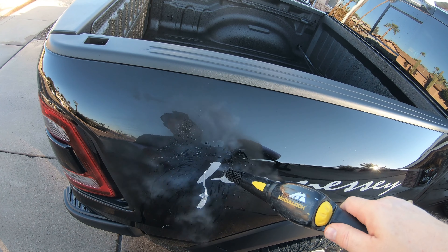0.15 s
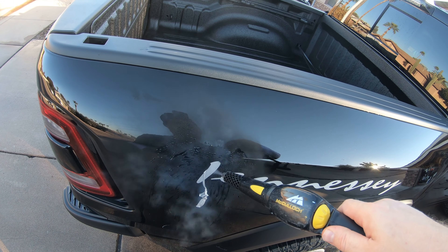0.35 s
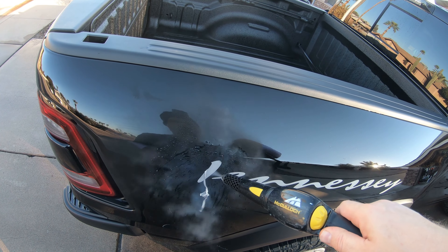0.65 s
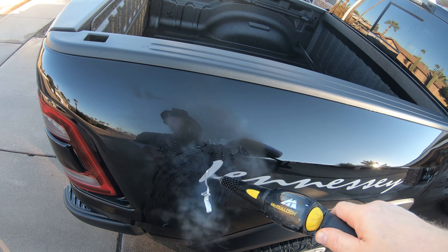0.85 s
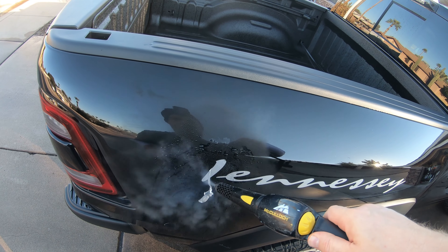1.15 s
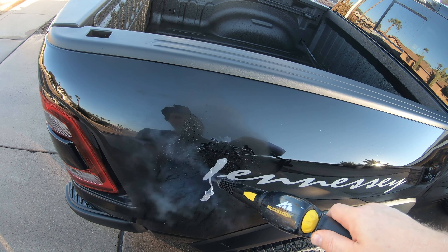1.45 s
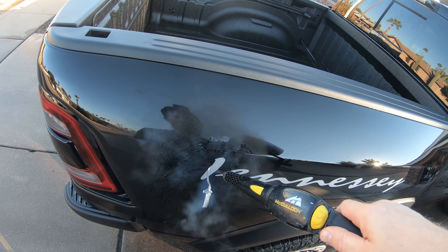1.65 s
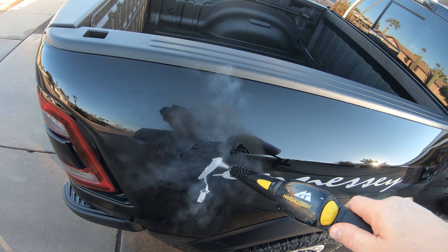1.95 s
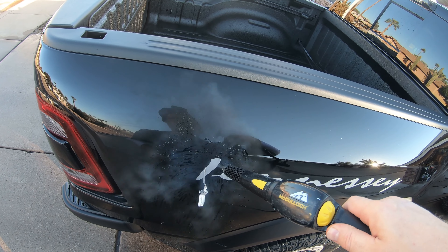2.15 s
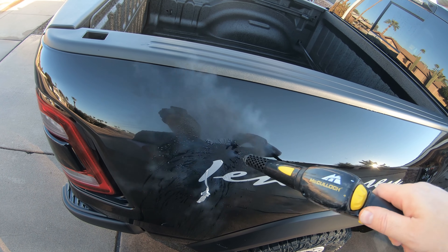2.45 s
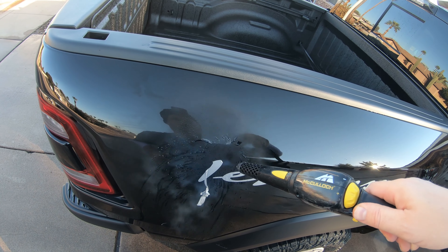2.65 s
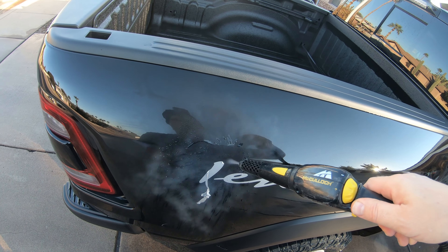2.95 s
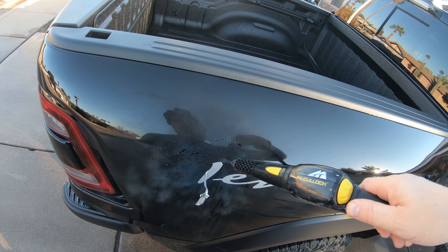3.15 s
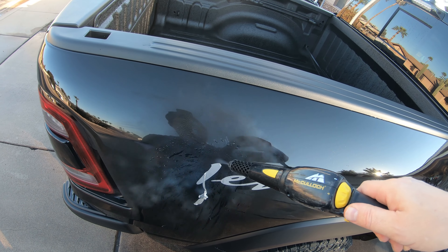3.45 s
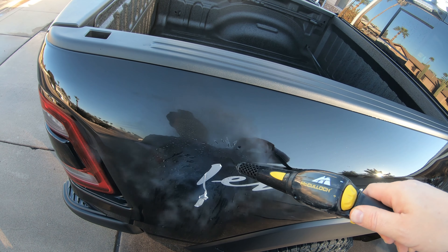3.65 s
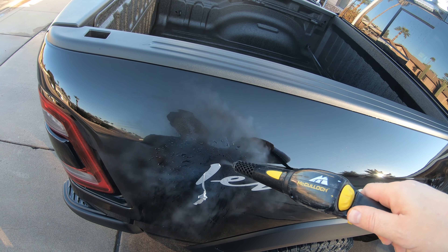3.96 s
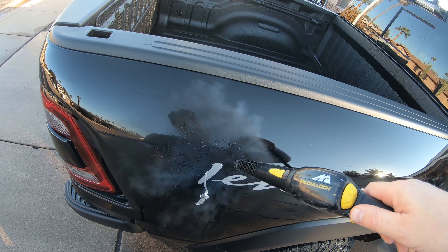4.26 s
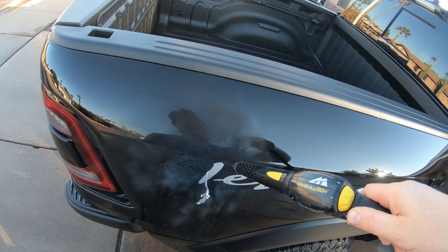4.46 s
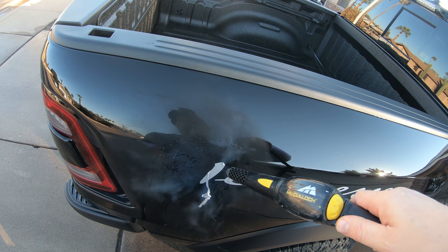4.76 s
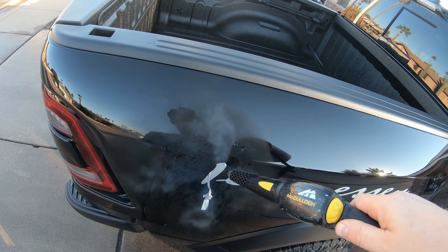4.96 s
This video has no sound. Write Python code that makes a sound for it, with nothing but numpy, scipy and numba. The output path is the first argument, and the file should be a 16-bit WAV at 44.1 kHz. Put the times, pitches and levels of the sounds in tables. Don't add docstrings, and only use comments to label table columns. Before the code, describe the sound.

A close, rough steam hiss is already running at the start and continues to the end, about 5.1 seconds. It is hollow and coloured by the narrow gap between nozzle and panel, with airy treble and a grainy flutter of fine droplets. Sharp wet spits crack near 0.1, 0.4, 0.6 and 0.9 seconds. From about 1.0 to 1.7 the jet weakens and wide fizzing over the paint stands out, with hardly any large spits. It swells strongly around 1.9 to 2.1, with more spits, eases near 2.4, and surges again around 2.6 and 3.1. Spits come at 2.9, in a cluster at 3.3 to 3.6, then at 3.8, 4.1 to 4.3, 4.9 and 5.0, each briefly ducking the sound. Far below, outdoor engines drone and rumble, with soft deep swells near 0.6, 1.2, 1.9 and 4.7, and faint tyre hiss.

```python
import sys
import numpy as np
from scipy import signal
from scipy.fft import rfft, irfft
from scipy.io import wavfile
from scipy.ndimage import uniform_filter1d
from numba import njit

SR = 44100
rng = np.random.default_rng(int(sys.argv[2]) if len(sys.argv) > 2 else 0)


def gain_from_db(level_db):
    decades = np.asarray(level_db, float) / 20
    return 10 ** decades


def to_wav(s):
    ch = np.atleast_2d(s).T
    pcm = np.round(np.clip(ch, -1, 1) * 32767)
    wavfile.write(sys.argv[1], SR, pcm.astype(np.int16))


N = 225836
T = np.arange(N) / SR
HZ = np.fft.rfftfreq(N, 1 / SR)


def level(x, db):
    return x * gain_from_db(db) / np.sqrt(np.mean(x ** 2))


def along_time(table):
    s, *columns = np.transpose(table)
    return [np.interp(T, s, c) for c in columns]


def along_pitch(table):
    hz, *columns = np.transpose(table)
    return [np.interp(np.log(HZ + 1), np.log(hz), c) for c in columns]


def swells(table):
    centre_s, length_s, *columns = np.transpose(table)
    coarse = T[::64]
    phase = np.clip((coarse[:, None] - centre_s) / length_s, -.5, .5)
    shape = np.cos(np.pi * phase) ** 2
    return [np.interp(T, coarse, shape @ c) for c in columns]


def walk(rate):
    hold = int(SR / rate)
    steps = np.repeat(rng.standard_normal(N // hold + 1), hold)
    smooth = uniform_filter1d(uniform_filter1d(steps, hold), hold)[:N]
    return smooth / smooth.std()


def colour(ports, table):
    return irfft(rfft(ports) * gain_from_db(np.array(along_pitch(table))), N)


def partly_alike(common, shared):
    shared = np.clip(shared, 0, 1)
    return np.sqrt(shared) * common + np.sqrt(1 - shared) * rng.standard_normal((2, N))


@njit
def ring(x, hz, width):
    out, first, second = np.empty(len(x), np.complex128), 0j, 0j
    r = np.exp(-np.pi * width / SR)
    for i in range(len(x)):
        pole = r * np.exp(2j * np.pi * hz[i] / SR)
        first = first * pole + (1 - r) * x[i]
        second = second * pole + (1 - r) * first
        out[i] = 2 * second
    return out


def resonate(x, modes, scale, own=0, flicker_db=0, rate=12):
    out = 0
    for hz, width, left_db, right_db, lead in modes:
        push = x + own * rng.standard_normal(N)
        z = ring(push, hz * scale, 1. * width) * gain_from_db(flicker_db * walk(rate))
        left = gain_from_db(left_db) * (z * np.exp(.5j * lead)).real
        right = gain_from_db(right_db) * (z * np.exp(-.5j * lead)).real
        out = out + np.array([left, right])
    return out


# start_s, jet_db, turned_to_ports_db
STREAM = [(0, -28.5, 0.5), (.5, -28.3, 0.5), (.92, -30, 0.5), (1.02, -31.5, 2), (1.3, -33, 1.5),
          (1.6, -32, 0.5), (1.75, -28.5, -1.5), (1.95, -26, -1), (2.15, -27, 1.5), (2.42, -30.5, 2),
          (2.7, -28, 0.5), (3.15, -26.5, -1.5), (3.6, -28.5, 0), (4.1, -29, 1.5), (4.6, -29.5, 1),
          (4.9, -28.5, -1.5), (5.12, -29, -2)]
# centre_s, length_s, rise_db, extra_treble_db
SURGES = [(.1, .12, 0, 0), (.28, 0.26, 2, -0.5), (.605, 0.034, 3, -2), (.935, .04, 4.5, -6),
          (1.69, 0.21, 5.5, -4.5), (1.98, 0.29, 1.5, 0.5), (2.06, 0.095, 2, 0.5), (2.55, 0.31, 6.5, 1.5),
          (3.03, 0.18, 4.5, 0.5), (3.14, 0.22, 3.5, 2), (3.28, 0.18, 2.5, 1), (3.48, .2, 4, 1),
          (3.78, .24, 6.5, -1), (3.9, 0.12, 3, 0), (4.04, 0.36, 5, -0.5), (4.3, 0.25, 5.5, -1),
          (4.55, 0.27, 3.5, -1.5), (5.08, 0.14, 2, 1.5)]
USUAL_JET_DB = -28
BODY_DB, HOUSING_DB, TOP_DB = -11, 0.7, -12
BODY_HOLD, BODY_TURN = 1.2, 0.57
HOUSING_TURN, TOP_TURN = 1.13, 1.3


def flow():
    jet_db, turn_db = along_time(STREAM)
    rise_db, treble_db = swells(SURGES)
    body_db = BODY_DB - BODY_HOLD * (jet_db - USUAL_JET_DB) - BODY_TURN * turn_db
    turn_db = turn_db + treble_db
    housing_db = HOUSING_DB + HOUSING_TURN * turn_db
    top_db = TOP_DB + TOP_TURN * turn_db
    return jet_db + rise_db, body_db, housing_db, top_db


def droplets(per_s, spread_db):
    chance, size = rng.random((N, 2)).T
    size_db = -spread_db * np.log(1 - .98 * size)
    return (chance < per_s / SR) * gain_from_db(size_db) * rng.choice([-1., 1.], N)


# pitch_hz, width_hz, left_db, right_db, left_lead_rad
BODY = [(2110, 545, -2.5, -4, 0.01)]
# pitch_hz, width_hz, left_db, right_db, left_lead_rad
GAP = [(2700, 600, -9, -7.5, -.4), (3200, 620, -1, 4.5, .1), (3750, 600, -6, -5.5, 0),
       (4250, 560, -.5, 2.5, -.3), (5100, 550, -6, -4.5, -1.2), (5550, 500, -7, -6.5, -2.3)]
# pitch_hz, width_hz, left_db, right_db, left_lead_rad
HOUSING = [(6400, 800, -2, 0, 0), (7100, 950, -1, -6, 2.7), (7850, 400, -8, -9, 3.1),
           (8330, 400, -3.5, .5, -.6), (8800, 320, -7, -4, -2.9), (9250, 800, -5, 3.5, -1.2),
           (9800, 600, -12, 0, -1)]
# pitch_hz, left_db, right_db
TOP = [(9000, -29, -11), (10200, 3, 4.5), (11100, -3, 0), (11770, -4, 6.5), (13100, 4.5, -5),
       (14000, -15, 4.5), (15600, -4, -6), (16500, -20, -23)]


def jet(jet_db, body_db, housing_db, top_db, scale):
    sputter = gain_from_db(0.62 * walk(9.5) + 0.52 * walk(60) + 0.84 * walk(350))
    drops = level(droplets(per_s=250, spread_db=3.0), -16.0)
    body = level(resonate(drops, BODY, scale, sputter), -0.43)
    gap = level(resonate(drops, GAP, scale, sputter), 0.11)
    housing = level(resonate(drops, HOUSING, scale ** 0.24, sputter, flicker_db=1.0), -0.9)
    hiss = partly_alike(rng.standard_normal(N) + drops, shared=0.58)
    top = level(sputter * colour(hiss, TOP), -0.37) * gain_from_db(0.43 * walk(11))
    steam = gap + gain_from_db(body_db) * body + gain_from_db(housing_db) * housing + gain_from_db(top_db) * top
    return gain_from_db(jet_db) * steam


# pitch_hz, left_db, right_db
FIZZ = [(1160, -16, -12.5), (1700, -10.5, -5), (3400, -3, -1), (5000, -4, -1.5), (6400, -9, -0.5),
        (7540, 0, 4.5), (8450, -24, 3), (9200, -17, -1.5), (10300, -32, -9), (11100, -23, -18),
        (12500, -23, -18), (16000, -35, -31)]
# pitch_hz, width_hz, left_db,
# right_db, left_lead_rad
GLANCING = [(3900, 1600, -7.5, -6.5, 0), (5900, 550, -5, 0, 3), (7500, 600, -2, 1, 3),
            (8200, 400, -6, 0, 2.6), (8950, 500, -8, 0, -2.8)]


def fizz(fizz_db):
    sputter = gain_from_db(0.54 * walk(8.03) + 1.1 * walk(200))
    wide = level(colour(rng.standard_normal((2, N)) * sputter, FIZZ), 1.6)
    glancing = resonate(0, GLANCING, np.ones(N), sputter, flicker_db=3.0, rate=3.53)
    return gain_from_db(fizz_db) * (wide + level(glancing, -0.51))


NULL_HZ, NULL_WIDTH_HZ = 7800, 1100


def cancel(ports, depth):
    hz = NULL_HZ * (1 + .008 * walk(1.2) + .012 * walk(14))
    return ports - depth * ring(ports.mean(axis=0), hz, 1. * NULL_WIDTH_HZ).real


# pitch_hz, likeness (0 to 1), left_minus_right_db, left_lead_rad
PORTS = [(30, 1, -6, 0.01), (130, 0.96, 0.2, 0.01), (300, 0.94, -2, 0.01), (600, 0.93, -1.5, 0.01),
         (920, 0.92, -5.5, 0.67), (1390, 0.81, -1, 0.62), (1750, 0, 8, 3.5)]


def far(spectrum, trim_db):
    like, pan_db, lead = along_pitch(PORTS)
    like = np.clip(like, 0, 1)
    mid, side = rfft(rng.standard_normal((2, N))) * gain_from_db(along_pitch(spectrum)[0])
    mid = mid * np.sqrt(1 + like)
    side = side * np.sqrt(1 - like)
    tilt = gain_from_db(pan_db / 2) * np.exp(.5j * lead)
    return level(irfft(np.array([(mid + side) * tilt, (mid - side) / tilt]), N), trim_db)


# pitch_hz, level_db (per Hz)
DEEP = [(12, -40), (20, -19), (64, 0), (110, -7), (140, -18), (240, -120)]
# pitch_hz, level_db (per Hz)
RUMBLE = [(65, -47), (110, -1), (221, -0.5), (316, -10.5), (404, -6), (581, -11), (650, -16), (840, -62),
          (1430, -120)]
# pitch_hz, level_db (per Hz)
TYRES = [(320, -10.5), (550, -17.5), (687, -6), (905, 1.5), (1230, 2), (1590, -3), (1770, -9), (1900, -26),
         (2470, -73), (4180, -120)]
# pitch_hz, width_hz, level_db
DRONES = [
    (56, 17, -12.5),
    (82.5, 17.5, -7),
    (165.5, 9, -12.5),
]
# centre_s, length_s, deep_rise_db, rumble_rise_db, tyre_rise_db
PASSES = [
    (.03, .25, 8.5, -3, -1),
    (.62, 0.37, 9.5, 2, 1.5),
    (1.18, 0.47, 6.5, 0, -0.5),
    (1.45, 0.66, -3, 4, 0),
    (1.85, 1, 5.5, 1.5, 1),
    (2.8, 0.48, 3, -1, -3),
    (4.65, .8, 4.5, -0.5, -0.5),
]
DEEP_DB, RUMBLE_DB, TYRES_DB = -48.5, -47.5, -38
DEEP_WANDER_DB, RUMBLE_WANDER_DB, TYRES_WANDER_DB = 2.5, 1.3, 0.14


def traffic():
    deep_db, rumble_db, tyre_db = swells(PASSES)
    deep_db = deep_db + DEEP_DB + DEEP_WANDER_DB * walk(3.98)
    rumble_db = rumble_db + RUMBLE_DB + RUMBLE_WANDER_DB * walk(3.6)
    tyre_db = tyre_db + TYRES_DB + TYRES_WANDER_DB * walk(3.9)
    drones = 0
    for hz, width, db in DRONES:
        noise = rng.standard_normal(N)
        wavering_hz = hz * (1 + 0.042 * walk(0.68))
        drones = drones + level(ring(noise, wavering_hz, 1. * width).real, db)
    engines = (far(DEEP, -0.61) + drones) * gain_from_db(deep_db) + far(RUMBLE, 0.8) * gain_from_db(rumble_db)
    return engines + far(TYRES, 0.081) * gain_from_db(tyre_db)


# start_s, peak_db
SPITS = [(0.0563, -10), (0.073, -9), (0.0823, -9), (0.3681, -11), (0.6028, -9), (0.6062, -9), (0.6086, -11),
         (0.6321, -13), (0.9368, -11), (0.9387, -11), (1.9378, -9), (1.9541, -9), (1.9818, -10),
         (2.3813, -11), (2.9059, -7), (2.9304, -9), (3.3367, -9), (3.3584, -10), (3.3788, -10),
         (3.3849, -10), (3.538, -7), (3.5409, -13), (3.6158, -9), (3.8075, -8), (4.1222, -12), (4.1822, -9),
         (4.263, -10), (4.8645, -9), (4.867, -11), (5.0109, -11)]
# pitch_hz, width_hz, left_db, right_db, left_lead_rad
CRACK = [(4200, 3400, -3, -1, 0)]
SPIT_HOUSING_DB = -5


def spits(scale):
    start_s, peak_db = np.transpose(SPITS)
    at = (start_s * SR).astype(int) + 22
    push, sharp, still = np.zeros(N), np.zeros(N), np.ones(N)
    push[at] = gain_from_db(peak_db)
    sharp[at] = gain_from_db(peak_db + SPIT_HOUSING_DB)
    rung = resonate(push, GAP, scale) + resonate(sharp, HOUSING, still)
    drop = resonate(push, CRACK, still) + gain_from_db(-6) * rung
    return drop * gain_from_db(peak_db.max() + .5) / np.abs(drop.mean(axis=0)).max()


# start_s, fizz_on_paint_db, third_gap_ring_hz
AIM = [(0, -33, 3230), (.4, -32, 3340), (.9, -29, 3330), (1.05, -29, 3500), (1.5, -28.5, 3590),
       (1.7, -27, 3370), (1.9, -29, 3320), (2.3, -33.5, 3360), (2.5, -31, 3190), (2.7, -35, 3220),
       (3.2, -33.5, 3180), (3.7, -34.5, 3205), (4.2, -33, 3200), (4.6, -33.5, 3210), (4.8, -31.5, 3350),
       (5.12, -31.5, 3340)]
GAP_THIRD_HZ = 3200


def scene():
    fizz_db, third_hz = along_time(AIM)
    scale = third_hz / GAP_THIRD_HZ
    square = np.clip(1.4 - 30 * (scale - 1), .05, .7)
    steam = jet(*flow(), scale) + fizz(fizz_db)
    return cancel(steam, square) + spits(scale) + traffic()


@njit
def duck(x, top, ratio, attack, release):
    gain, loudness = np.ones(len(x)), 0.
    for i in range(len(x)):
        loudness += (x[i] - loudness) * (attack if x[i] > loudness else release)
        if loudness > top:
            gain[i] = (top / loudness) ** (1 - 1 / ratio)
    return gain


def low_pass(x):
    return signal.sosfilt(signal.butter(12, 15810, fs=SR, output="sos"), x)


TOP_HZ = 15800


def record(dry):
    attack, release = 1 / (.0007 * SR), 1 / (.04 * SR)
    gain = duck(np.abs(dry).max(axis=0), gain_from_db(-15), 2., attack, release)
    cut = irfft(rfft(dry * gain) / (1 + (HZ / TOP_HZ) ** 400), N)
    return low_pass(cut)


dry = scene()
out = record(dry)
to_wav(out)
```